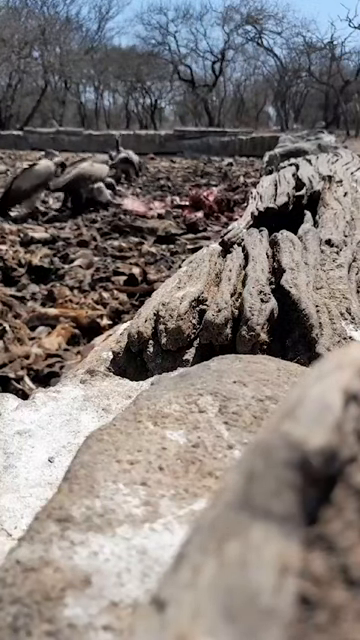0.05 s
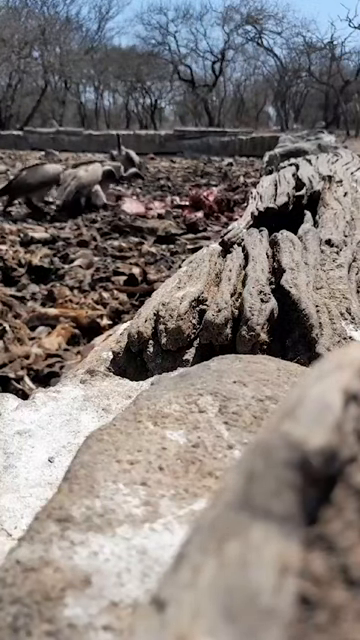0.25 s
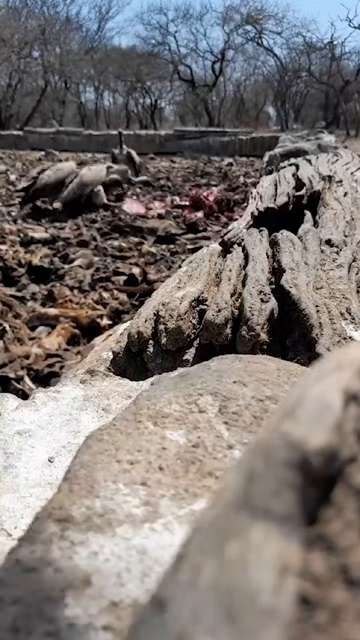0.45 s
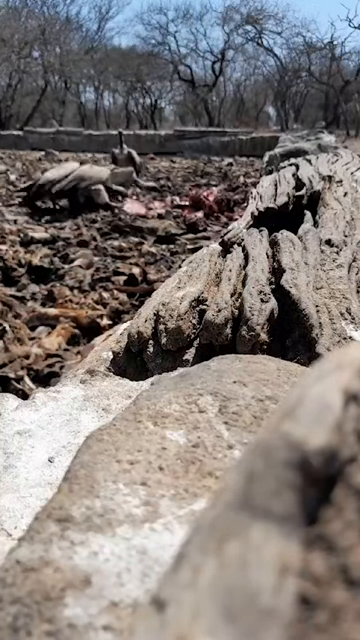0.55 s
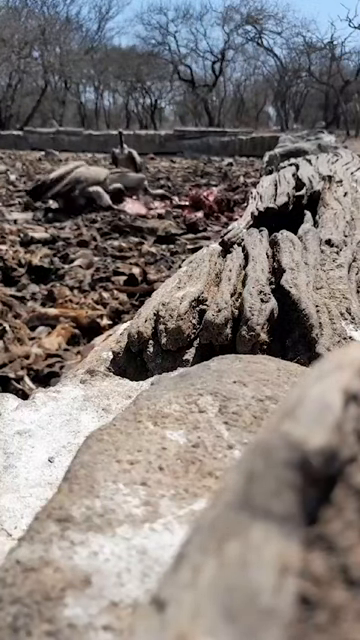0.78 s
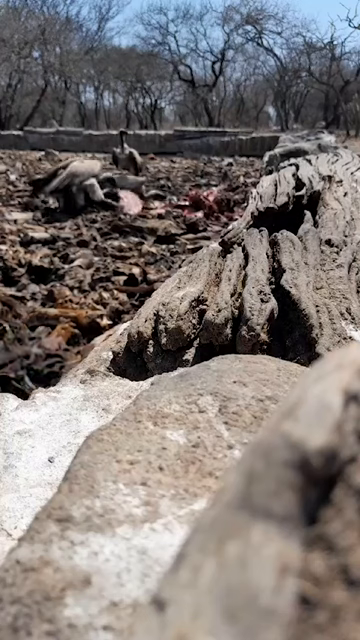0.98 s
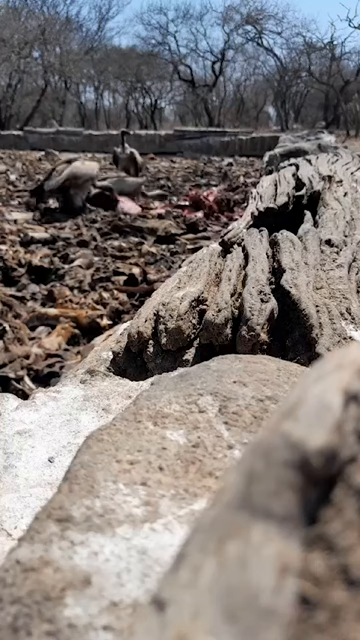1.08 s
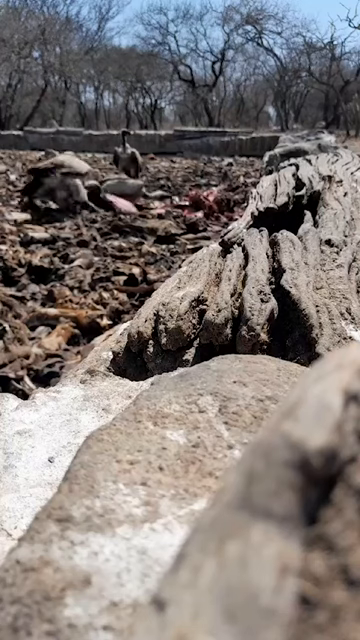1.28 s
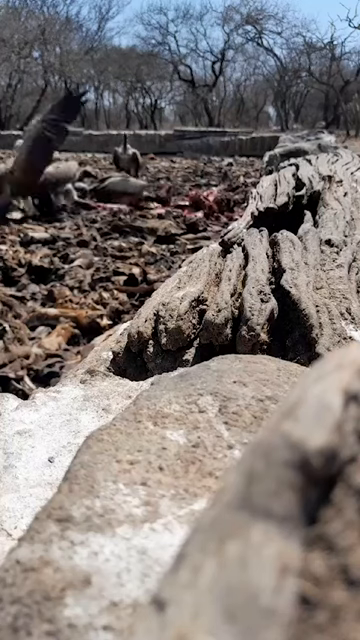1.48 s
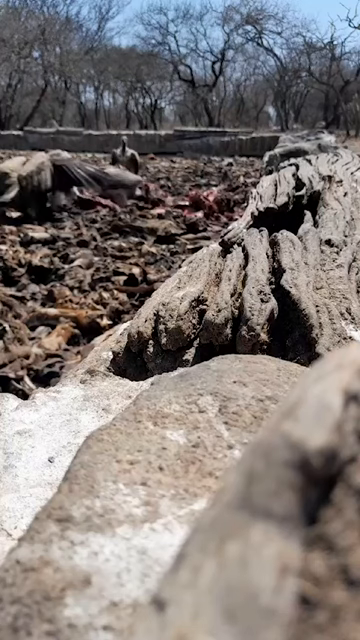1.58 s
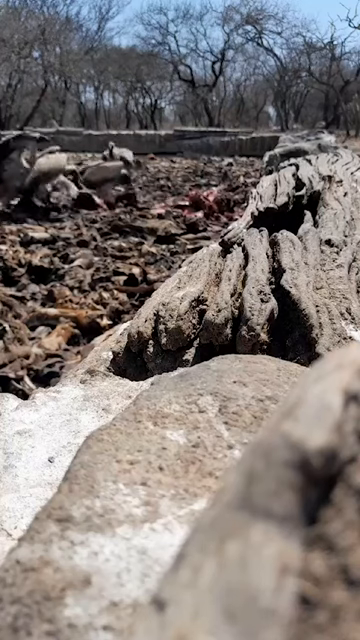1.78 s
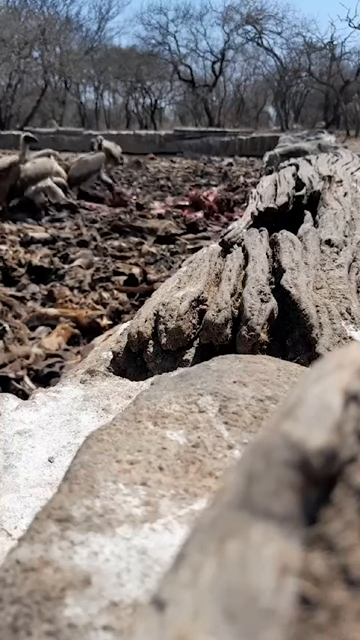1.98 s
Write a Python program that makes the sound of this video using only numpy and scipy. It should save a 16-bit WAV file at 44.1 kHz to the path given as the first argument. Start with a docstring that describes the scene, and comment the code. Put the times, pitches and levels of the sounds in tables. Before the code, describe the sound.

A vulture gives two rough, buzzing rasps while others squabble among dry bones in wind

```python
"""A large scavenging bird rasps twice: a steady low buzz of partials breaks into a rough croak, made of
slaps and breath ringing in the throat. Other birds squabble around it on dry ground a few metres away.
Bones knock and feathers snap as short ringing tones with bright cracks; wings and claws scrape as gritty
noise; bodies shuffle as soft knocks and feathers rustle as dense grains. Gusts thud on the two microphone
ports as lumpy low noise, over a smooth distant ambience."""
import sys
import numpy as np
from scipy import signal
from scipy.fft import rfft, irfft
from scipy.io import wavfile
from scipy.ndimage import uniform_filter1d

SR = 44100
rng = np.random.default_rng(int(sys.argv[2]) if len(sys.argv) > 2 else 0)


def unload_audio(sound):
    """Save the sound as a 16-bit wav file, at the path given as the first command line argument."""
    columns = np.transpose(np.atleast_2d(sound))
    # keep every value between -1 and 1, then stretch to whole-number steps
    steps = np.round(np.clip(columns, -1, 1) * 32767)
    wavfile.write(sys.argv[1], SR, steps.astype(np.int16))


def volts(x):
    """Linear amplitude factor 10**(x/20) for a level x in dB, scalar or array-like."""
    e = np.asarray(x, float) / 20
    return 10 ** e


N = 90404
T = np.arange(N) / SR
HZ = np.fft.rfftfreq(N, 1 / SR)

# The two rasps, before one common lift: [t/s, pitch f/Hz, level/dB]
RASP_CALLS = [
    [(0.31, 87.15, -85), (0.32, 87.27, -54), (0.352, 87.58, -45), (0.434, 90.62, -44.5),
     (0.65, 91.98, -42.5), (0.698, 90.8, -35.5), (0.796, 78.6, -36.5), (0.842, 78.43, -34.5),
     (0.88, 79.27, -37.5), (0.91, 75.97, -37.5), (0.938, 73.2, -50.5), (0.955, 71.53, -50)],
    [(1.19, 93.21, -59.5), (1.214, 92.53, -39), (1.242, 91.34, -42), (1.44, 93.8, -43.5),
     (1.504, 97.5, -41), (1.54, 94.02, -37), (1.558, 93.47, -36.5), (1.662, 93.82, -36), (1.686, 92.4, -36),
     (1.726, 88.48, -39.5), (1.748, 90.6, -40.5), (1.79, 89.1, -73)],
]
# Roughness of the voice: [t/s, roughness/0-1]
ROUGHNESS = [(.3, .8), (.345, .5), (.37, .12), (.42, .05), (.6, .05), (.65, .14), (.67, .6), (.75, .5),
             (.77, .22), (.86, .22), (.89, .5), (.96, .5), (1.19, .8), (1.22, .5), (1.24, .08), (1.44, .05),
             (1.485, .15), (1.51, .6), (1.8, .6)]
# Membrane slaps in each cycle, before shimmer: [position/share of a cycle, level/dB]
MEMBRANE_SLAPS = [(0, 4.5), (0.298, 0.5), (0.548, 3), (.78, 0.5)]
# Throat resonances: [f/Hz, width of one filter pass/Hz, level when steady/dB, level when rough/dB]
THROAT_RESONANCES = [(499, 225, -9, -5.5), (881, 180, -17, -8.5), (1113, 340, -3, -0.5),
                     (1275, 194, -18, 6), (1474, 163, -14, 7), (1625, 106, -7, -3.5),
                     (1810, 112, -10.5, -9.5), (2270, 1500, -27.5, -23.5), (3297, 440, -20, -13),
                     (4506, 910, -22, -18), (5260, 720, -26, -20.5)]
# Partials of the steady buzz, before wavering: [multiple of the pitch, level/dB]
BUZZ_PARTIALS = [(7, -19), (8, -17), (9, -16), (10, -8), (11, -1.5), (12, -2.5), (13, -6), (14, -.5),
                 (15, -9), (16, 0.5), (17, -9), (18, -13), (19, -9), (20, -8), (21, -23), (22, -18),
                 (23, -19), (24, -27)]
# Hollow knocks of bone on stone, before a common lag and the ports: [t/s, level/dB, f/Hz]
BONE_KNOCKS = [(0.212, -33.5, 533), (0.234, -37, 394), (0.248, -43.5, 338), (0.48, -33.5, 500),
               (0.499, -31.5, 360), (0.734, -18.5, 545), (0.863, -33, 402), (0.985, -25.5, 511),
               (1.136, -37.5, 347), (1.171, -36, 420), (1.254, -31.5, 394.6), (1.285, -33, 400),
               (1.752, -33, 617.4)]
# Feather and twig snaps, before the ports: [t/s, level/dB, f/Hz]
FEATHER_SNAPS = [(0.096, -60, 3000), (0.233, -42.5, 3420), (0.273, -53, 4700), (0.5064, -34, 3380),
                 (0.5688, -45, 4300), (0.7846, -36.5, 3032), (1.0814, -41.5, 3883), (1.1034, -46, 4330),
                 (1.1094, -34.5, 4450), (1.1154, -43, 3870), (1.1246, -29, 3600), (1.1363, -31, 4270),
                 (1.152, -32, 4510), (1.1645, -33.5, 4216), (1.169, -32.5, 4100), (1.3597, -43, 3643),
                 (1.7521, -36.5, 3400), (1.8207, -42.5, 4170), (1.835, -54, 4630)]
# Dry scrapes of wing and claw, before the ports: [start t/s, length/s, level/dB]
SCRAPE_STROKES = [(0.22, 0.028, -55), (0.472, 0.061, -49.5), (0.994, .045, -47), (1.095, 0.098, -46.5),
                  (1.194, 0.08, -52), (1.741, .025, -46.5), (1.809, 0.045, -50.5)]
# Tone colour of the scrapes: [f/Hz, level/dB]
SCRAPE_SPECTRUM = [(300, -43), (700, 2.5), (1300, 6.5), (2500, 5), (3400, -4), (4300, -6), (5200, -12),
                   (6500, -42), (16000, -59)]
# Bodies shuffling among bones, before a common trim: [t/s, level/dB]
SCUFFLE_LEVEL = [(0.0, -55), (0.02, -56), (0.19, -68), (0.21, -57.5), (0.25, -48.5), (0.28, -57),
                 (0.33, -60), (0.47, -50), (0.5, -40), (0.51, -42.5), (0.54, -53), (0.56, -44.5),
                 (0.6, -49), (0.63, -45), (0.68, -48), (0.74, -44), (0.76, -42.5), (0.8, -46),
                 (0.87, -39.5), (0.96, -47.5), (0.99, -38), (1.03, -44.5), (1.05, -50), (1.12, -40.5),
                 (1.23, -49.5), (1.25, -48.5), (1.31, -46.5), (1.33, -52), (1.37, -41.5), (1.42, -47.5),
                 (1.49, -49), (1.58, -45.5), (1.62, -58.5), (1.69, -40), (1.76, -52), (1.78, -49),
                 (1.86, -49), (1.89, -59.5), (1.97, -50.5), (2.05, -61)]
# Feathers and scuffling feet, relative to the loudest row and before stretching: [t/s, level/dB]
RUSTLE_LEVEL = [(0.0, -70), (0.04, -66), (0.22, -93), (0.23, -64), (0.24, -60), (0.28, -61), (0.28, -66.5),
                (0.56, -52), (0.66, -55.5), (0.88, -50.5), (0.95, -55.5), (1.1, -55), (1.11, -47),
                (1.16, -48), (1.17, -53), (1.18, -51), (1.73, -53), (1.76, -52), (1.76, -56.5), (1.87, -58),
                (2.03, -59.5), (2.05, -76)]
# Tone colour of the rustle: [f/Hz, level/dB]
RUSTLE_SPECTRUM = [(1500, -34), (3000, -12), (4600, -5.5), (6200, -34.5), (8000, -27.5), (11000, -17),
                   (13500, -12.5), (15700, -22)]
# Wind on the ports, before trim and chance swings: [t/s, level/dB]
GUST_LEVEL = [(0.0, -59), (0.03, -46.5), (0.2, -63.5), (0.24, -40), (0.26, -58.5), (0.28, -67),
              (0.35, -51.5), (0.39, -70), (0.44, -47.5), (0.47, -59), (0.51, -35), (0.57, -67), (0.63, -48),
              (0.82, -63.5), (0.84, -45), (0.87, -50), (0.91, -35.5), (0.97, -57), (1.0, -33.5),
              (1.03, -36), (1.06, -62), (1.12, -35), (1.18, -57), (1.23, -55), (1.31, -37), (1.33, -56),
              (1.39, -38.5), (1.43, -39.5), (1.45, -44.5), (1.52, -50.5), (1.55, -38), (1.65, -37),
              (1.69, -45), (1.82, -54.5), (1.84, -47), (2.05, -58)]
# Tone colour of the wind: [f/Hz, level/dB]
GUST_SPECTRUM = [(15, -23), (25, -23), (75, 6.5), (119, 4.5), (222, -13), (300, -9.5), (390, 0),
                 (660, -120)]
# Tone colour of the distant ambience: [f/Hz, level/dB]
AIR_SPECTRUM = [(88, -43), (150, -3), (210, 7), (436, 4), (700, 2.5), (1400, -1.5), (2300, -2.5),
                (3800, -2.5), (6000, -12), (9000, -22), (13000, -15), (15700, -12)]
# Ambience, left over right; the rustle uses part of this: [f/Hz, level/dB]
AIR_LEFT_OVER_RIGHT = [(150, -2), (400, -.5), (2400, 0), (4400, 3), (8000, 32.5), (15000, 4)]
# How alike the ambience is at the two ports: [f/Hz, likeness/0-1]
AIR_LIKENESS = [(150, 1), (400, 0.94), (1000, 0), (15000, 0)]
# Phase lead of the left port for the calling bird: [f/Hz, lead/radians]
LEFT_PHASE_LEAD = [(0, 0), (600, .6), (900, 3.3), (1640, 4.5), (1890, 6.4), (2700, 7.4), (3360, 7.9),
                   (3800, 9.2), (4400, 13.2), (6000, 18.3), (16000, 47)]
# Left port over right port for the birds: [f/Hz, level/dB]
LEFT_OVER_RIGHT = [(150, -11), (330, 5), (770, -5), (1200, -0.5), (1800, 1.2), (2700, 4.5), (4200, -3.5),
                   (8000, 18.5)]
# Echoes from ground and rocks, before the split between ports: [delay t/s, level/dB]
GROUND_ECHOES = [(.0045, -14), (.011, -16), (.023, -19), (.041, -23)]

# At full roughness: cycle timing spread (share of a cycle), slap level spread, breath against the slaps
JITTER, SHIMMER_DB, BREATH_DB = 0.1, 5, -3
STEADY_UNDER = 0.2  # the buzz fades out as roughness climbs to this
ODD_CYCLE_DB = 5  # every other cycle is stronger while the voice is steady
PUFF_ABOVE_HZ, PUFF_DECAY, PUFF_CLICK_DB = 2000, 2.8, -8  # decay is per cycle
BUZZ_DB, BUZZ_WAVER_DB = 1.5, 2  # buzz against the croak; spread of each partial
BRIGHTEN_DB, MEAN_PITCH_HZ = 0.3, 92.5  # per partial number and Hz of pitch
WAVER_HZ, AIR_WAVER_DB = 4, 0.7  # slow wavering of partials and ambience
KNOCK_T60_S, KNOCK_UPPER, KNOCK_UPPER_DB, KNOCK_LAG_S = 0.0098, 1.665, -10.5, 0.0011
SNAP_T60_S, CRACK_T60_S, CRACK_DB, CRACK_LEFT_DB = 0.0025, 0.0046, -2.5, 5
SCUFFLE_PER_S, SCUFFLE_DB = 400, -2
RUSTLE_DB, RUSTLE_SWING, GRAINS_PER_S = -50, 1.24, 1700  # swing stretches the level table
GUST_ALIKE, GUST_LEFT_DB = 0.5, -4  # likeness 0-1; left over right
AIR_DB = -56.5
BODY_LEAD = 0.51  # moving bodies are nearer the middle: share of the caller's phase lead
CUTOFF_HZ = 15750
HALF_EACH = np.array([[0.5], [-0.5]])  # splits a left-over-right level between the ports


def rms_one(x):
    """Scale to rms 1."""
    return x / np.sqrt(np.mean(x ** 2) + 1e-20)


def in_time(rows):
    """Join the rows of a table into smooth lines over time, one per column."""
    t, *columns = np.transpose(rows)
    return [np.interp(T, t, column) for column in columns]


def at_hz(points):
    """Read a table at every frequency, on a log-frequency axis."""
    points = np.array(points)
    return np.interp(np.log(HZ + 1), np.log(points[:, 0]), points[:, 1])


def shape(x, gain):
    """Filter by a gain per frequency."""
    return irfft(rfft(x) * gain, N)


def drift(rate):
    """Slow random movement with spread 1: noise smoothed by two equal poles at rate Hz."""
    r = np.exp(-2 * np.pi * rate / SR)
    smooth = signal.lfilter([1], [1, -2 * r, r * r], rng.standard_normal(N + SR))
    return rms_one(smooth[SR:])  # skip the filter's start


def ring(x, hz, t60):
    """Each unit click starts a dying sine of starting height 1, down 60 dB after t60 seconds."""
    r, w = volts(-60 / (t60 * SR)), 2 * np.pi * hz / SR
    return signal.lfilter([0, np.sin(w)], [1, -2 * r * np.cos(w), r * r], x + 1e-18)


def resonance(x, hz, width_hz):
    """Let a band through with gain near 1 at its top, applied twice for steeper sides."""
    r = np.exp(-np.pi * width_hz / SR)
    b = (1 - r * r) / 2 * np.array([1, 0, -1])
    a = [1, -2 * r * np.cos(2 * np.pi * hz / SR), r * r]
    return signal.lfilter(b, a, signal.lfilter(b, a, x))


def random_clicks(rate, spread_db):
    """Clicks at random times, about rate per second, of random size and sign."""
    size = volts(spread_db * np.minimum(rng.exponential(1, N), 4))
    return (rng.random(N) < rate / SR) * size * rng.choice([-1, 1], N)


def grains(rate, low_hz, high_hz, cycles, spread_db):
    """Random clicks dealt to 16 small resonators, each dying over a few cycles; rms 1."""
    clicks = random_clicks(rate, spread_db)
    dealt = rng.integers(0, 16, N)
    pitches = np.geomspace(low_hz, high_hz, 16)
    return rms_one(sum(ring(clicks * (dealt == k), hz, cycles / hz) for k, hz in enumerate(pitches)))


def pair(alike):
    """Spectra of two noises that share a common part."""
    mid, side = rfft(rng.standard_normal((2, N)))
    alike = np.clip(alike, 0, 0.99)
    return np.sqrt(1 + alike) * mid + np.sqrt(1 - alike) * side * [[1], [-1]]


def slaps(phase, rough, steady):
    """Membranes slap several times a cycle; roughness makes the slap sizes uneven."""
    pulses = np.zeros(N)
    cycle = np.arange(1, int(phase[-1]))
    for share, db in MEMBRANE_SLAPS:
        at = np.interp(cycle + share, np.maximum.accumulate(phase), np.arange(N))
        i = at.astype(int)
        shimmer_db = SHIMMER_DB * rough[i] * rng.standard_normal(len(i))
        size = volts(db + shimmer_db + ODD_CYCLE_DB * (cycle % 2) * steady[i])
        # share each slap between the two nearest samples
        np.add.at(pulses, i, size * (1 - at + i))
        np.add.at(pulses, i + 1, size * (at - i))
    return rms_one(pulses)


def croak(phase, rough, steady):
    """Slaps and breath excite the throat; its high resonances ring on one puff of air a cycle."""
    breath = rms_one(np.exp(-3.0 * (phase % 1)) * rng.standard_normal(N))
    source = slaps(phase, rough, steady) + volts(BREATH_DB) * rough * breath
    puff_size = np.exp(-PUFF_DECAY * (phase % 1)) * volts(ODD_CYCLE_DB * (phase % 2 > 1) * steady)
    puffs = rms_one(puff_size * rng.standard_normal(N)) + volts(PUFF_CLICK_DB) * source
    out = np.zeros(N)
    for k, (hz, width, steady_db, rough_db) in enumerate(THROAT_RESONANCES):
        band = resonance(puffs if hz > PUFF_ABOVE_HZ else source, hz, width)
        out += (-1) ** k * band * volts(rough_db + (steady_db - rough_db) * steady)
    return rms_one(out)


def buzz(phase, pitch):
    """Wavering sines at multiples of the pitch; the tone brightens as the pitch climbs."""
    out = np.zeros(N)
    climb = np.clip(pitch - MEAN_PITCH_HZ, -2, 1)
    for k, db in BUZZ_PARTIALS:
        size = volts(db + BUZZ_WAVER_DB * drift(WAVER_HZ) + BRIGHTEN_DB * (k - 14) * climb)
        out += size * np.sin(2 * np.pi * (k * phase + rng.random()))
    return rms_one(out)


def rasp():
    """One voice: roughness shakes the cycle timing and turns the steady buzz into a croak."""
    pitch, level_db = in_time(np.vstack(RASP_CALLS))
    rough, = in_time(ROUGHNESS)
    phase = np.cumsum(pitch) / SR + JITTER * rough * drift(29.24)  # counted in cycles
    steady = np.clip(1.5 * (1 - rough / STEADY_UNDER), 0, 1)
    voice = croak(phase, rough, steady) + volts(BUZZ_DB) * steady * buzz(phase, pitch)
    # even out the loudness first, so the level table sets it
    voice = voice / np.sqrt(uniform_filter1d(voice ** 2, size=2600) + 1e-12)
    sounding = sum((T > call[0][0]) & (T < call[-1][0]) for call in RASP_CALLS)
    return voice * volts(level_db + 6.5) * sounding


def blows(rows, t60, upper, upper_db):
    """Each blow rings a body at its pitch and one other partial, swelling briefly, then dying away."""
    out, t = np.zeros(N + SR), np.arange(SR // 10) / SR
    swell = t / t60 * volts(-60 * t / t60)
    for s, db, hz in rows:
        tone = np.sin(2 * np.pi * hz * t) + volts(upper_db) * np.sin(2 * np.pi * hz * upper * t)
        start = int(s * SR)
        out[start:start + len(t)] += volts(db) * tone * swell / swell.max()
    return out[:N]


def knocks():
    """Bone on stone: a hollow low tone with a fainter partial above it."""
    rows = [(s + KNOCK_LAG_S, db, hz) for s, db, hz in BONE_KNOCKS]
    return blows(rows, KNOCK_T60_S, KNOCK_UPPER, KNOCK_UPPER_DB)


def snaps():
    """Feathers and twigs: a very short high tone with a partial about an octave below."""
    return blows(FEATHER_SNAPS, SNAP_T60_S, 0.52, -0.5)


def cracks():
    """The bright edge of each snap: fast-dying treble noise, separate in each port."""
    fade = np.zeros(N)
    for s, db, _ in FEATHER_SNAPS:
        fade += volts(db + CRACK_DB - 60 * np.maximum(T - s, 0) / CRACK_T60_S) * (T > s)
    treble = signal.butter(2, 7500, "high", fs=SR, output="sos")
    bright = signal.sosfilt(treble, rng.standard_normal((2, N)))
    return fade * bright * volts(CRACK_LEFT_DB * HALF_EACH)


def scrapes():
    """Wing and claw strokes: random clicks mixed with noise, faded in and out."""
    stroke = np.zeros(N)
    for s, length, db in SCRAPE_STROKES:
        stroke += volts(db) * np.clip(np.minimum(T - s, s + length - T) / 0.0082, 0, 1)
    grit = rms_one(random_clicks(1200, 3.6)) + 2.1 * rng.standard_normal(N)
    return stroke * rms_one(shape(grit, volts(at_hz(SCRAPE_SPECTRUM))))


def scuffle():
    """Bodies shuffling among bones: many soft low knocks."""
    level_db, = in_time(SCUFFLE_LEVEL)
    return grains(SCUFFLE_PER_S, 350, 772, 8.7, 2.86) * volts(level_db + SCUFFLE_DB)


def rustle():
    """Feathers and feet: dense dry grains and noise whose level swings with the birds' movement."""
    level_db, = in_time(RUSTLE_LEVEL)
    out = []
    for side in (1, -1):  # left, right
        fine = grains(GRAINS_PER_S, 2900, 22500, 3.8, 4.5) + 1.2 * rng.standard_normal(N)
        colour_db = at_hz(RUSTLE_SPECTRUM) + side * at_hz(AIR_LEFT_OVER_RIGHT) * 0.36
        out.append(shape(fine, volts(colour_db)))
    return rms_one(np.array(out)) * volts(RUSTLE_DB + RUSTLE_SWING * (level_db - level_db.max()))


def gusts():
    """Wind thuds on the ports: lumpy low noise, stronger on the right."""
    level_db, = in_time(GUST_LEVEL)
    low = rms_one(irfft(pair(GUST_ALIKE) * volts(at_hz(GUST_SPECTRUM)), N))
    return low * volts(level_db - 2.0 + 4.0 * drift(14) + GUST_LEFT_DB * HALF_EACH)


def air():
    """Distant ambience: smooth noise, alike at both ports in the bass only, wavering slowly."""
    colour_db = at_hz(AIR_SPECTRUM) + at_hz(AIR_LEFT_OVER_RIGHT) * HALF_EACH
    noise = rms_one(irfft(pair(at_hz(AIR_LIKENESS)) * volts(colour_db), N))
    return noise * volts(AIR_DB + AIR_WAVER_DB * drift(WAVER_HZ))


def ports(x, lead):
    """Direct sound reaches the left port first; echo delays differ between the sides."""
    turn = lead * np.interp(HZ, *np.transpose(LEFT_PHASE_LEAD))
    out = []
    for side in (1, -1):  # left, right
        direct = np.exp(-1j * turn * (side < 0))
        stretch = 1 + 0.08 * side
        echoes = sum(volts(db) * np.exp(-2j * np.pi * HZ * s * stretch) for s, db in GROUND_ECHOES)
        out.append(shape(x, (direct + echoes) * volts(side * at_hz(LEFT_OVER_RIGHT) / 2)))
    return np.array(out)


def scene():
    """Add up all sources at the two ports."""
    bodies = knocks() + snaps() + scrapes() + scuffle()
    birds = ports(rasp(), 1) + ports(bodies, BODY_LEAD)
    return birds + cracks() + rustle() + gusts() + air()


def roll_off(x):
    """The treble ends steeply here."""
    return signal.sosfilt(signal.butter(12, 15740, fs=SR, output="sos"), x)


def record(dry):
    """Cut everything above the top frequency and finish the mix."""
    finished = shape(dry, HZ < CUTOFF_HZ)
    return roll_off(finished)


dry = scene()
out = record(dry)
unload_audio(out)
```